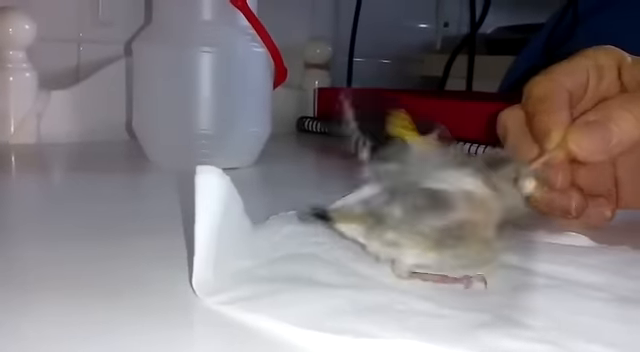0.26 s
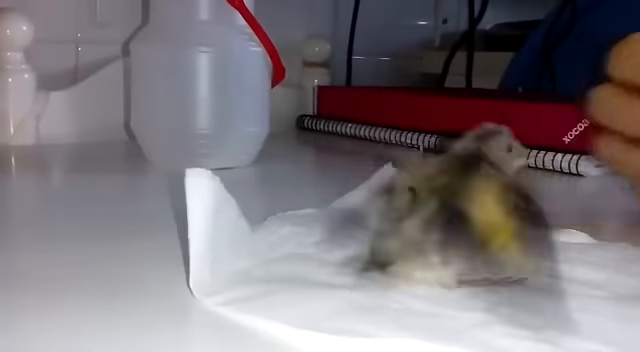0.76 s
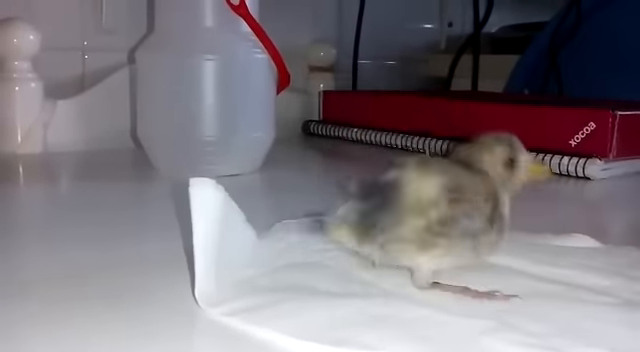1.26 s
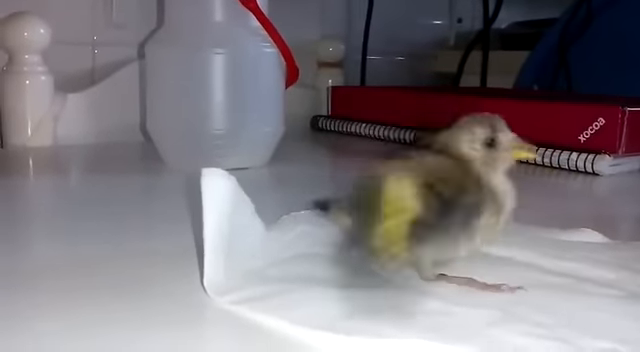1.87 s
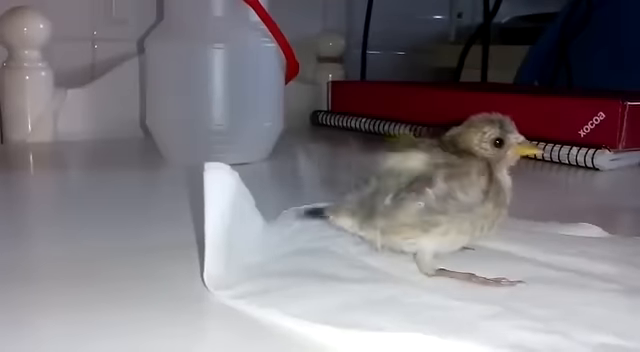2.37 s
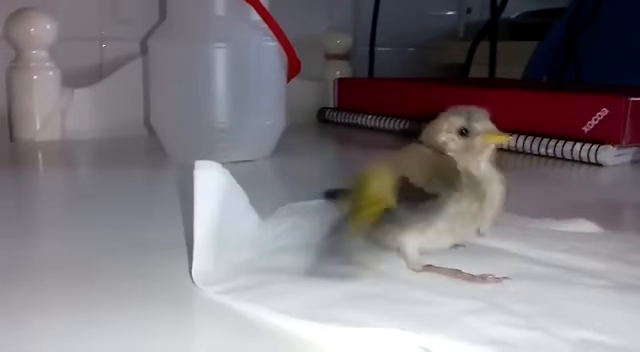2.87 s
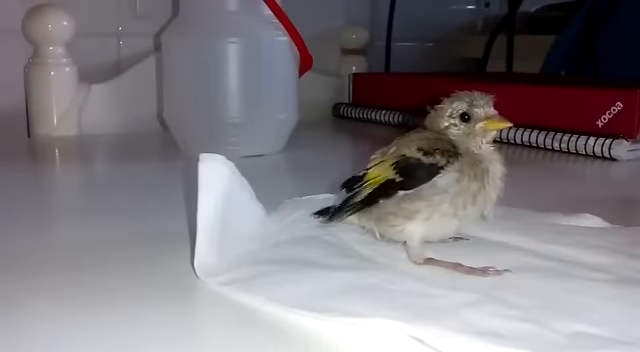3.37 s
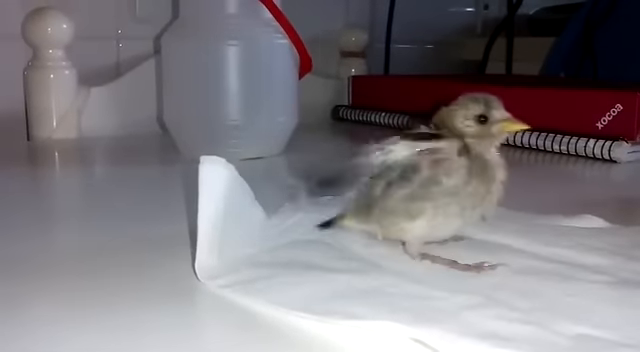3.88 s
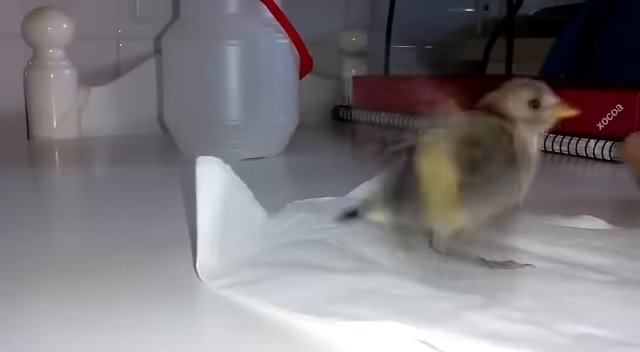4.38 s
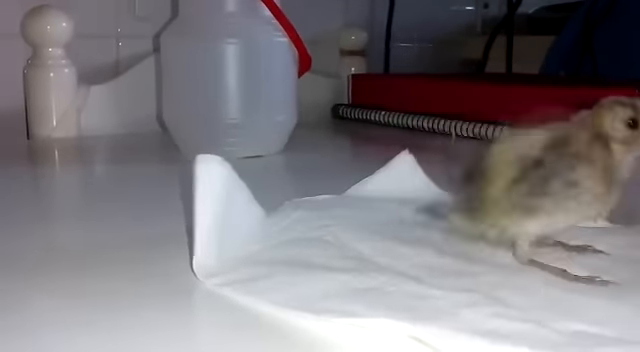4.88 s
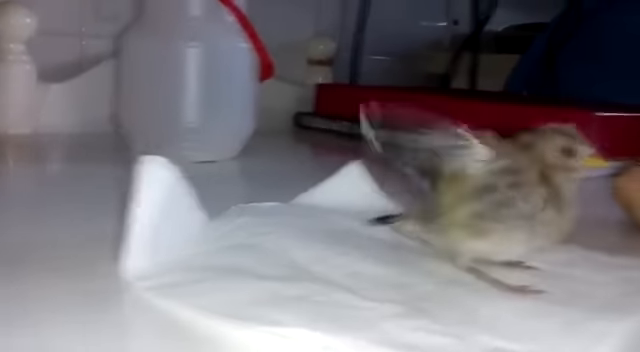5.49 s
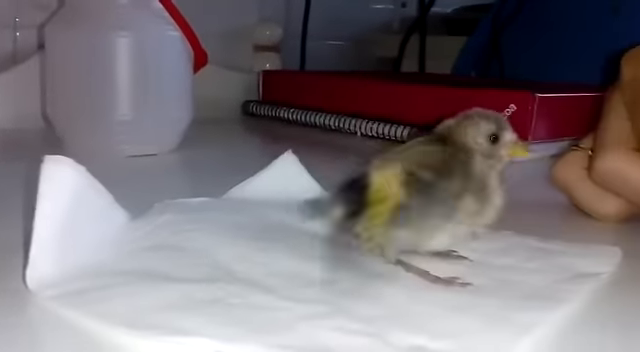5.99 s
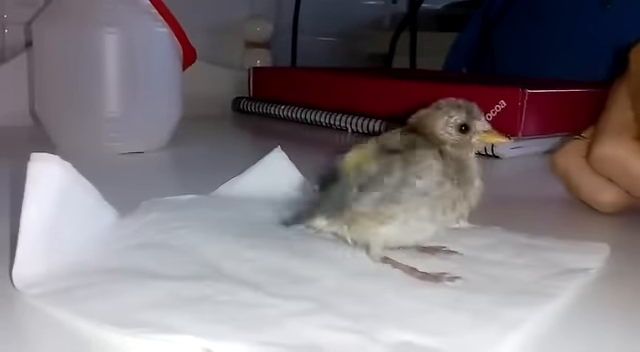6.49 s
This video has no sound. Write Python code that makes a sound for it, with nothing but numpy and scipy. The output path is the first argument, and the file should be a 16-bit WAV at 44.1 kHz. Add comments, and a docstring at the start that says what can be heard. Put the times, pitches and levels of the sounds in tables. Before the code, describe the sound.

A fledgling finch begs in a small, reflective room, very close to the microphone. The echo of an earlier chip dies away at the start, over steady low rumble and soft hiss that ease slightly later. Faint dry ticks of beak or claws fall around 0.2 s. At 1.17 s comes a tiny, very high falling tsee, then lower upward chips at 1.32 and 1.50. Similar clusters start at 2.04, with two chips, and 3.00, with one, preceded by light ticks from 2.8 to 2.95. A tsee and chip follow at 3.75 and 3.90. The longest cluster begins at 4.33, with three chips to 4.86, the last higher. Single tsee-chip pairs come at 5.43 and 6.13. Each call lasts only hundredths of a second, piercing, slightly reedy and overloaded, with a short bright ring afterwards.

```python
"""Begging fledgling finch

A young finch begs on a table in a small room, very near the microphone. Each cluster is a thin falling
'tsee' and one to three lower rising 'chip's: quick pitch curves sung by both sides of the syrinx, its voice box.
A few light ticks, made of damped rings and snaps of noise, sound over steady coloured room noise.
Random reflections make the echoes; the recorder's limiter turns the loudest calls down, and peaks clip.
"""
import sys
import numpy as np
from scipy import signal
from scipy.fft import rfft, irfft
from scipy.io import wavfile
from scipy.ndimage import uniform_filter1d

SR = 44100
rng = np.random.default_rng(int(sys.argv[2]) if len(sys.argv) > 2 else 0)


def wav_out(sig):
    """Save sig, one row per channel (or a flat mono array), as 16-bit PCM at SR to the path in sys.argv[1]."""
    wavfile.write(sys.argv[1], SR, np.round(np.clip(np.atleast_2d(sig).T, -1, 1) * 32767).astype(np.int16))


N = 296793  # length of the scene in samples

# Thin 'tsee's, which go to a crest, drop and slide to a trough.
# Columns: [t/s, rise/s, fall/s, crest f/Hz, trough f/Hz, start level/dB, crest level/dB,
# level/dB after the drop (before it grows), lead-in whistle level/dB,
# level/dB of the whistle over the crest, level/dB of the whistle over the fall]
TSEES = [ (1.174, .012, 0.022, 9500, 7354, -19, -3.5, -3.5, -52, -13.5, -33),
         (2.043, .019, .013, 8270, 7330, -16, -3, -2, -34, -36, -2.5),
         (3.000, 0.014, 0.013, 8870, 7400, -3.5, -17, -0.5, -32, -18, -33),
         (3.754, 0.0057, .019, 8870, 7450, -11, -8, 2.5, -39, -14.5, -39),
         (4.327, 0.014, 0.011, 8660, 7120, -12, -9, 3.5, -26.5, -14.5, 1),
         (5.428, 0.0063, 0.0185, 9200, 7374, -28, -15.5, 0, -47, -36, -40),
         (6.132, 0.012, 0.01, 8210, 7300, -6.5, 1.5, 4, -27, -40, -40)]
# Whistle arcs riding above the main voice: [length/s, then first, middle and last f/Hz above crest or trough]
OVER_CREST = (0.0216, 170, 1080, 310)
OVER_TROUGH = (0.016, 1850, 1430, 1200)
TSEE_START_HZ = 7810
CREST_SHARE = 0.6  # the crest comes part way through the rise
DROP_S, SLIDE_HZ = 0.003, 837  # from the crest the pitch drops at once to this far above the trough
FALL_CURVE = 1.5  # the slide flattens out
FLICK_S, FLICK_HZ = 0.0087, 606  # each ends with a small upward flick
TSEE_SURGE_S, TSEE_GROW_DB = 0.0043, 4.5  # the level shifts at the drop and grows along the slide
TSEE_RELEASE_S, TSEE_RELEASE_DB = 0.0013, 18.5
CREST_DELAY_S, FALL_DELAY_S = 0.003, 0.0025  # the whistles come in slightly late


def tsee(s, rise, fall, crest_hz, trough_hz, start_db, crest_db, fall_db,
         lead_db, over_crest_db, over_fall_db):
    """The pitch goes to a crest, drops into a slide and flicks up; gives the main gesture and its whistles."""
    t = np.arange(int((rise + fall + FLICK_S) * SR)) / SR
    sliding = ramp(t, rise, fall)
    flick = FLICK_HZ * ramp(t, rise + fall, FLICK_S)
    rising_hz = TSEE_START_HZ + (crest_hz - TSEE_START_HZ) * ramp(t, 0, CREST_SHARE * rise)
    falling_hz = trough_hz + SLIDE_HZ * (1 - sliding) ** FALL_CURVE + flick
    hz = rising_hz + (falling_hz - rising_hz) * ramp(t, rise, DROP_S)

    db = np.interp(t, [0, rise, rise + TSEE_SURGE_S], [start_db, crest_db, fall_db])
    db = db + TSEE_GROW_DB * sliding
    db = db - TSEE_RELEASE_DB * ramp(t, t[-1] - TSEE_RELEASE_S, TSEE_RELEASE_S)

    whistles = [lead_in(s, lead_db),
                arc(s + CREST_DELAY_S, OVER_CREST, crest_hz, over_crest_db),
                arc(s + rise + FALL_DELAY_S, OVER_TROUGH, trough_hz, over_fall_db)]
    return (s, hz, db, 0), whistles


# 'Chip's, a low note that breaks, climbs to a loud top and fades.
# Columns: [t/s, low note/s, climb/s, fade/s, low note f/Hz (middle of its sag), top f/Hz, arch of the top f/Hz,
# end f/Hz, low note peak level/dB, climb level/dB, top level/dB (before arch and fade),
# low note's extra overtone level/dB, lead-in whistle level/dB, top whistle level/dB]
CHIPS = [ (1.319, 0.0052, 0.015, 0.014, 3100, 4525, 130, 5070, -20.5, -11, -2, -4, -21, -10),
         (1.504, 0.015, 0.0064, 0.0083, 3123, 4710, 20, 4760, -6.5, -13, -3, -23, -36, -14),
         (2.196, 0.013, 0.0074, .011, 3152, 4564, -4, 4650, -6.5, -17.5, -0.5, -8, -27, -10.5),
         (2.401, 0.012, 0.0095, 0.014, 3192, 4870, 80, 5160, -7.5, -11, -4, -10, -24, -11.5),
         (3.147, 0.016, 0.0068, .015, 3257, 4540, 50, 4740, -6.5, -20, -2, -3, -22.5, -12),
         (3.899, 0.0093, .010, .011, 3190, 4510, 0, 4800, -10, -18, 0.5, 1.5, -27, -11),
         (4.472, 0.012, 0.011, 0.011, 3170, 4460, 50, 4830, -5, -17.5, -.5, 5, -26, -9),
         (4.646, 0.0093, .007, 0.0156, 3118, 4510, 202, 4960, -7.5, -16.5, -2, 7.5, -24.5, -4),
         (4.862, 0.0095, .0045, .027, 3200, 5630, 603, 5670, -13, -11, 0, 8, -19.5, 2.5),
         (5.587, .014, 0.0039, 0.014, 3237, 4600, 4, 4550, -9.5, -22, -4.5, 4.5, -21, -13),
         (6.307, 0.015, 0.0033, 0.015, 3236, 4760, 100, 4840, -8, -24, -6.5, -1, -24, -7.5)]
# Whistle arc above the top of a chip: [length/s, then first, middle and last f/Hz above the top]
OVER_TOP = (.014, 330, 720, 1600)
LOW_SAG_HZ = 168  # the low note sags in the middle
LOW_SWELL_DB, LOW_PEAK_SHARE, LOW_WANE_DB = 13, 0.65, 2.5  # it swells, and wanes before the break
BREAK_HZ, BREAK_S, CLIMB_HZ_PER_S = 4015, 0.00043, 30400  # it jumps up here, then climbs
TOP_JUMP_S, CHIP_SURGE_S = 0.001, 0.0023  # pitch and level hurry to the top
CHIP_FADE_DB, FADE_CURVE = 19, 2.9  # the top fades ever faster
ARCH_DB_PER_HZ = 0.0078  # the level follows the arch of the pitch
TOP_LEAD_S = 0.003  # the top whistle comes in early


def chip(s, low, climb, fade, low_hz, top_hz, arch_hz, end_hz, low_db, climb_db, top_db,
         overtone_db, lead_db, whistle_db):
    """A reedy low note breaks into a climb that surges at the top; gives the main gesture and its whistles."""
    top = low + climb
    t = np.arange(int((top + fade) * SR)) / SR
    broken = ramp(t, low - BREAK_S / 2, BREAK_S)
    surging = ramp(t, top - CHIP_SURGE_S, CHIP_SURGE_S)
    fading = ramp(t, top, fade)

    low_note_hz = low_hz + LOW_SAG_HZ * (1 - np.sin(np.pi * ramp(t, 0, low)))
    climbing_hz = BREAK_HZ + CLIMB_HZ_PER_S * (t - low)
    arch = arch_hz * np.sin(np.pi * fading)
    top_note_hz = top_hz + (end_hz - top_hz) * fading + arch
    high_note_hz = climbing_hz + (top_note_hz - climbing_hz) * ramp(t, top - TOP_JUMP_S, TOP_JUMP_S)
    hz = low_note_hz + broken * (high_note_hz - low_note_hz)

    below_peak_db = np.interp(t, [0, LOW_PEAK_SHARE * low, low], [LOW_SWELL_DB, 0, LOW_WANE_DB])
    low_level = low_db - below_peak_db
    high_level = climb_db + (top_db - climb_db) * surging
    high_level = high_level + ARCH_DB_PER_HZ * arch - CHIP_FADE_DB * fading ** FADE_CURVE
    db = low_level + broken * (high_level - low_level)

    whistles = [lead_in(s, lead_db), arc(s + top - TOP_LEAD_S, OVER_TOP, top_hz, whistle_db)]
    return (s, hz, db, overtone_db * (1 - broken)), whistles


# Low pitches are reedy with strong overtones; the middle ones waver most; rasp varies with pitch.
# Columns: [f/Hz, second harmonic level/dB, third harmonic level/dB, rasp level/dB, pitch jitter as a share]
REGISTER = [(3200, -6, -30, -10.5, 0.0047), (4190, -5, -25, -9, 0.01), (4480, -27.5, -52, -31.5, 0.023),
            (5400, -53, -62, -8, 0.018), (7620, -54, -74, -59, 0.002), (9200, -62, -78, -32, 0.0163)]
# Colour of the rasp: [f/Hz, level/dB]
RASP = [(2500, -41), (3150, -3), (4500, -3), (6300, 0), (7500, -7.5), (10000, -10), (11200, -22),
        (13000, -37)]
ONSET_S = 0.002  # soft start and end of each gesture


def main_voice(gestures, shimmer_db=1.5):
    """One membrane of the syrinx follows each quick pitch gesture, with overtones and rasp set by its pitch."""
    out, rasp, unsteady, flutter = np.zeros(N), noise(RASP), waver(460), waver(240)
    for s, hz, level, overtone_db in gestures:
        at = int(s * SR) + np.arange(len(hz))
        t = at / SR
        shaky_hz = hz * (1 + read(REGISTER, hz, axis=4) * unsteady[at])
        phase = 2 * np.pi * np.cumsum(shaky_hz) / SR
        tone = np.sin(phase)
        tone += gain_of(read(REGISTER, hz, axis=1) + overtone_db) * np.sin(2 * phase)
        tone += gain_of(read(REGISTER, hz, axis=2)) * np.sin(3 * phase)
        tone += gain_of(read(REGISTER, hz, axis=3)) * rasp[at]
        edges = np.clip(np.minimum(t - t[0], t[-1] - t) / ONSET_S, 0, 1)
        add(out, s, tone * edges * gain_of(level + shimmer_db * flutter[at]))
    return out


def second_voice(whistles, jitter=0.021):
    """The other membrane whistles short arcs that beat against the main voice where they overlap."""
    out, unsteady = np.zeros(N), waver(980)
    for s, length, first, middle, last, db in whistles:
        u = np.linspace(0, 1, max(int(length * SR), 2))
        bend = np.polyval(np.polyfit([0, .5, 1], [first, middle, last], 2), u)  # smooth curve through 3 pitches
        hz = bend * (1 + jitter * unsteady[int(s * SR):][:len(u)])
        whistle = np.sin(2 * np.pi * np.cumsum(hz) / SR)
        add(out, s, gain_of(db) * signal.windows.tukey(len(u), .5) * whistle)
    return out


# Whistle that starts just before a call: [length/s, first f/Hz, middle f/Hz, last f/Hz]
LEAD_IN = (0.015, 6950, 7550, 7550)
LEAD_OVERLAP_S = 0.003  # it runs this far into the call


def lead_in(s, db):
    """Places the short whistle of the other membrane that leads into a call at time s."""
    return arc(s - LEAD_IN[0] + LEAD_OVERLAP_S, LEAD_IN, 0, db)


def arc(s, shape, base_hz, db):
    """Places a whistle on a base pitch: (s, length s, first Hz, middle Hz, last Hz, dB)."""
    length, first, middle, last = shape
    return s, length, base_hz + first, base_hz + middle, base_hz + last, db


# Light dry ticks and scuffs of beak and claws.
# Columns: [t/s, ring level/dB, ring f/Hz, decay/s, amount of noisy snap relative to the ring]
TICKS = [(.207, -32.5, 3000, 0.0035, 1.5), (0.221, -38, 356, 0.015, 0.98), (0.247, -21, 2197, 0.0021, 1.3),
         (.250, -26, 316, 0.01, .6), (2.7855, -20.5, 2900, 0.0005, .3), (2.8514, -22, 1910, 0.0012, 0.56),
         (2.9437, -11, 2760, 0.00049, 1)]
# Colour of the snap: [f/Hz, level/dB]
SNAP = [(100, 20), (1000, 1), (2400, 15), (4000, -15), (7000, -3), (11000, -43), (15000, -35)]


def ticks():
    """Each tick is a snap of noise and one heavily damped ring."""
    out, t, grit = np.zeros(N), np.arange(SR // 20) / SR, noise(SNAP)
    for s, db, hz, decay, snap in TICKS:
        blow = np.sin(2 * np.pi * hz * t) + snap * grit[int(s * SR):][:len(t)]
        add(out, s, gain_of(db) * blow * np.exp(-t / decay))
    return out


# The room's ring: [f/Hz, time to die away by 60 dB/s, level/dB]
ROOM = [(1000, 0.12, -23.5), (3200, 0.42, -19.5), (4800, 0.26, -8.5), (6400, 0.28, -14), (7560, 0.22, -15),
        (10240, 0.3, -12), (15000, 0.059, -19)]


def room(x, near_db=-13, near_s=0.017, gap_s=0.0053):
    """Quick reflections from the table and the things on it, then the diffuse ring of the walls."""
    t = np.arange(SR // 2) / SR
    # random clicks of either sign, on about one sample in ten
    near, diffuse = rng.choice([-1., 1.], (2, len(t))) * (rng.random((2, len(t))) < 1 / 10)
    near = near * np.exp(-t / near_s) * (t > gap_s / 2)
    # each pitch of the ring dies away at its own pace
    hz, age, z = signal.stft(diffuse * (t > gap_s), SR, nperseg=256)
    decay = np.exp(-np.log(1000) * age / read(ROOM, hz)[:, None])
    tail = signal.istft(z * decay, SR)[1][:len(t)]
    walls = coloured(tail / np.linalg.norm(tail), [(f, db) for f, t60, db in ROOM])[:len(t)]
    echo = gain_of(near_db) * near / np.linalg.norm(near) + walls
    return signal.fftconvolve(x, echo)[:N]


# The room still ringing from a chip an instant earlier: [f/Hz, relative level/dB per Hz]
LAST_CHIP = [(2900, -57), (3600, -20), (4200, -14.5), (5100, -28), (5650, -17), (6000, 7.5), (6300, -15),
             (6700, -28), (8000, -20), (9200, -26.5), (10300, -47), (13000, -65)]


def dying_ring(db=-13.5, t60=0.26):
    """The echo of an earlier chip, coloured noise that fades away from the start."""
    return noise(LAST_CHIP) * gain_of(db) * np.exp(-np.log(1000) * np.arange(N) / SR / t60)


# Steady room noise: [f/Hz, relative level/dB per Hz]
AIR = [(20, -26), (35, -15), (60, -0.5), (150, -0.5), (290, -2.5), (520, -6.5), (1200, -9), (1900, -13.5),
       (3100, -18.5), (6400, -22), (8100, -38), (10200, -36.5), (11800, -37), (13000, -37.5),
       (15500, -37.5)]
# Its slow drift, added to the base level: [t/s, level/dB]
AIR_DRIFT = [(0, 2.5), (1, 2.37), (2.5, 1.27), (4.1, 0.8), (4.6, -0.5), (6.1, -0.5), (6.7, -0.3)]
AIR_DB = -33.5  # base level


def air():
    """Rumble and hiss of the room: coloured noise whose level drifts slowly."""
    drift_db = np.interp(np.arange(N) / SR, *np.transpose(AIR_DRIFT))
    return noise(AIR) * gain_of(AIR_DB + drift_db)


def noise(spectrum):
    """Noise of a given colour, as long as the scene."""
    return evened(coloured(rng.standard_normal(N), spectrum))


def waver(rate_hz):
    """Smooth random wandering of unit size, up to a given rate."""
    smoother = signal.butter(2, rate_hz, fs=SR, output="sos")
    return evened(signal.sosfilt(smoother, rng.standard_normal(N)))


def coloured(x, spectrum):
    """Shapes a sound by a gain curve."""
    gain = gain_of(read(spectrum, np.fft.rfftfreq(2 * N, 1 / SR)))
    return irfft(rfft(x, 2 * N) * gain)[:N]


def evened(x):
    """Scales to an rms (average strength) of one."""
    return x / np.sqrt(np.mean(x ** 2) + 1e-20)


def read(points, hz, axis=1):
    """Reads one column of a table along a log-frequency axis."""
    columns = np.transpose(points)
    return np.interp(np.log(hz + 1), np.log(columns[0] + 1), columns[axis])


def gain_of(db):
    """Decibels to amplitude."""
    return 10 ** (np.asarray(db) / 20)


def ramp(t, start, length):
    """Goes from 0 to 1 over a given stretch of time."""
    return np.clip((t - start) / length, 0, 1)


def add(mix, s, sound):
    """Adds a sound into the mix at time s."""
    part = mix[round(s * SR):][:len(sound)]
    part += sound[:len(part)]


def scene():
    """The bird hops about, so calls take turns among five sets of reflections."""
    gestures, whistles = zip(*[tsee(*row) for row in TSEES], *[chip(*row) for row in CHIPS])
    bird = main_voice(gestures) + second_voice(sum(whistles, [])) + ticks()
    # number of the current call, counted from just before it starts
    starts = sorted(gesture[0] - .03 for gesture in gestures)
    call = np.searchsorted(starts, np.arange(N) / SR)
    echoes = sum(room(bird * (call % 5 == place)) for place in range(5))
    return (bird + echoes + dying_ring() + air())[None]


def limiter(x, threshold_db=-9.5, attack_s=0.0092, recovery_db_per_s=400):
    """Listens mostly to the treble, turns everything down within milliseconds and soon lets go."""
    power = uniform_filter1d(np.diff(x, prepend=0) ** 2, size=88)  # the difference favours treble
    over_db = np.maximum(10 * np.log10(abs(power) + 1e-12) - threshold_db, 0)
    fall = np.arange(N) * recovery_db_per_s / SR
    held_db = np.maximum.accumulate(over_db + fall) - fall  # jumps up, then sinks steadily
    r = np.exp(-1 / (attack_s * SR))
    return x * gain_of(-signal.lfilter([1 - r], [1, -r], held_db))


# The recorder's dull top: [f/Hz, level/dB]
TOP = [(9000, 0), (11000, -1), (13000, -5), (15500, -5)]
EDGE_HZ = 15550  # hardly anything passes above this


def record(dry):
    """The limiter, clipping of the peaks that slip past it, a dull top and the band limit."""
    clipped = np.clip(limiter(dry[0]), -.94, .94)
    dulled = coloured(clipped, TOP)
    band_limit = signal.firwin(255, EDGE_HZ, window=("kaiser", 8), fs=SR)
    return signal.oaconvolve(dulled, band_limit, "same")[None]


dry = scene()
out = record(dry)
wav_out(out)
```